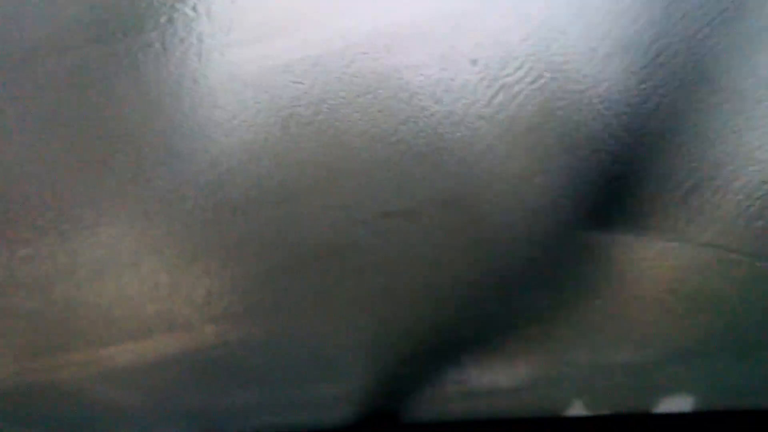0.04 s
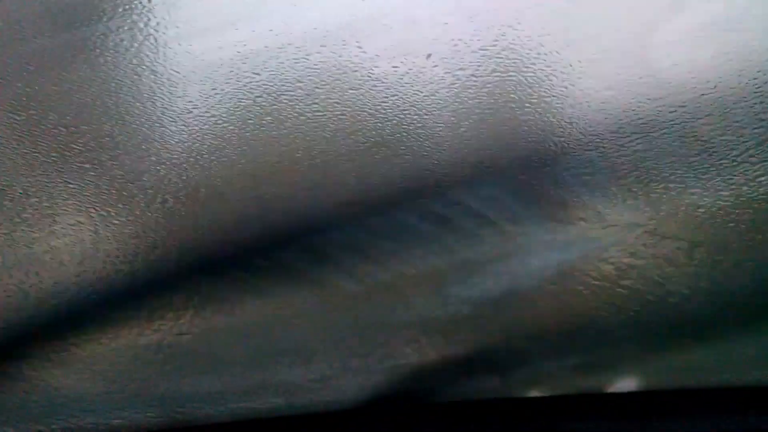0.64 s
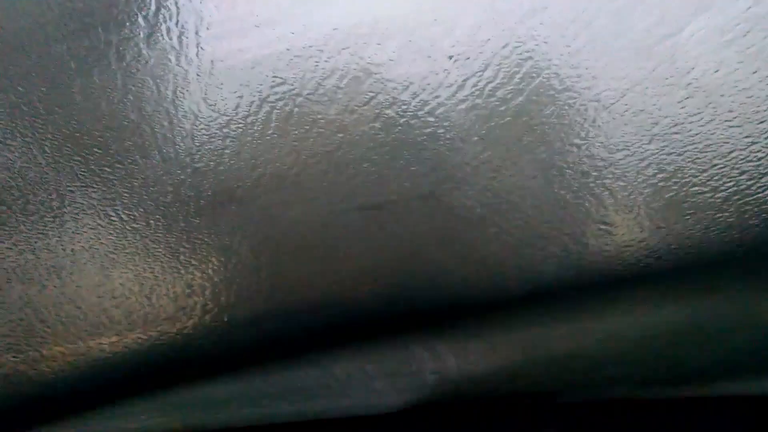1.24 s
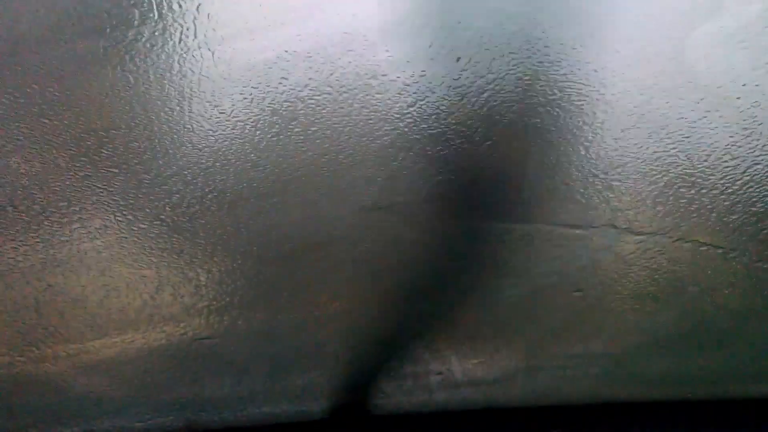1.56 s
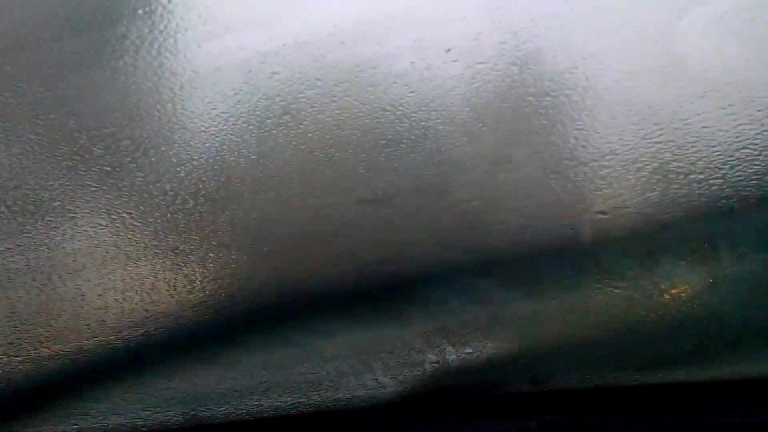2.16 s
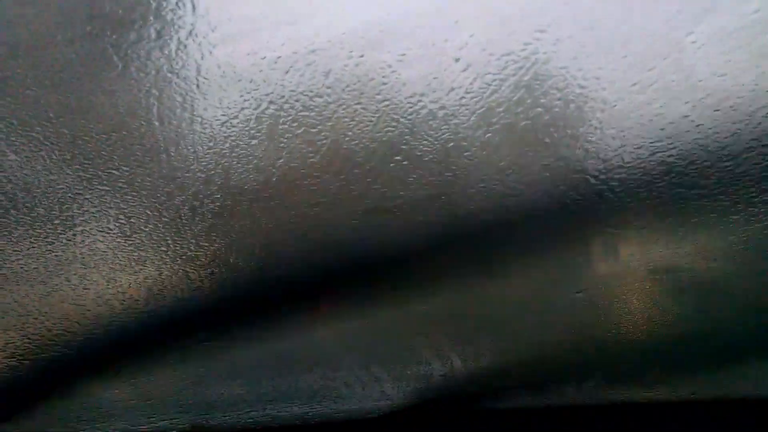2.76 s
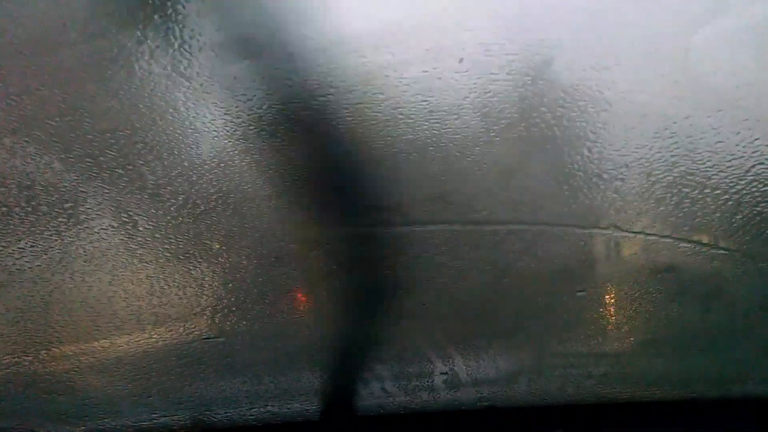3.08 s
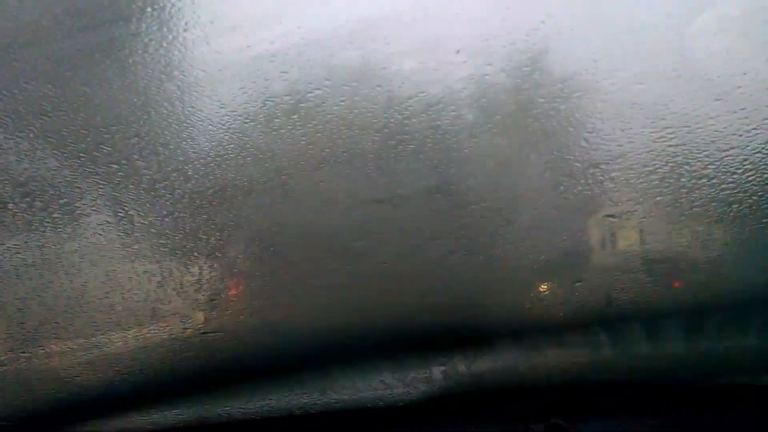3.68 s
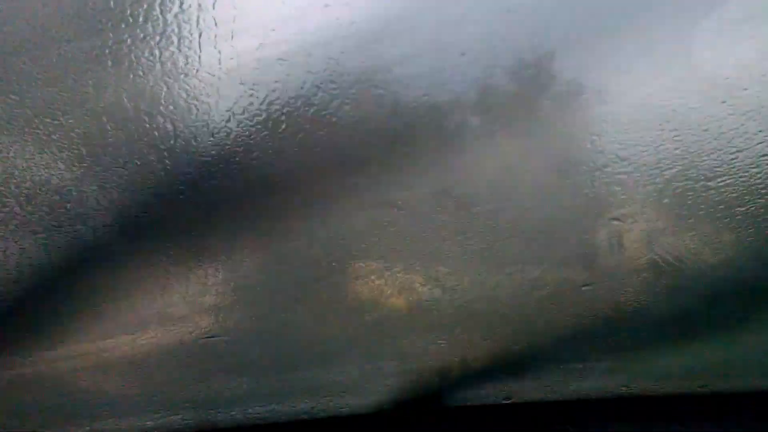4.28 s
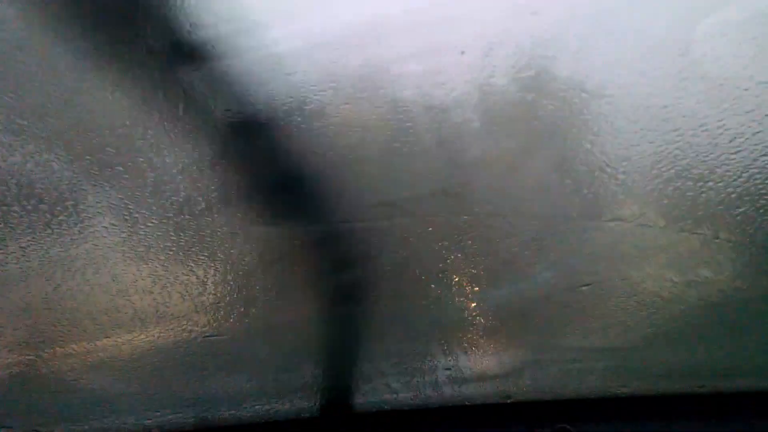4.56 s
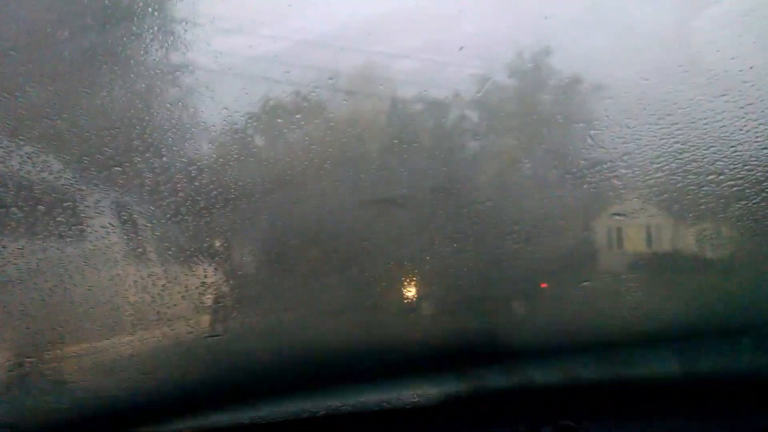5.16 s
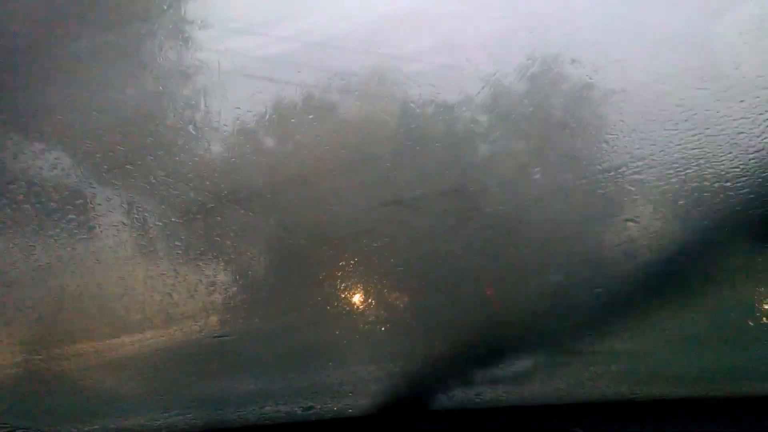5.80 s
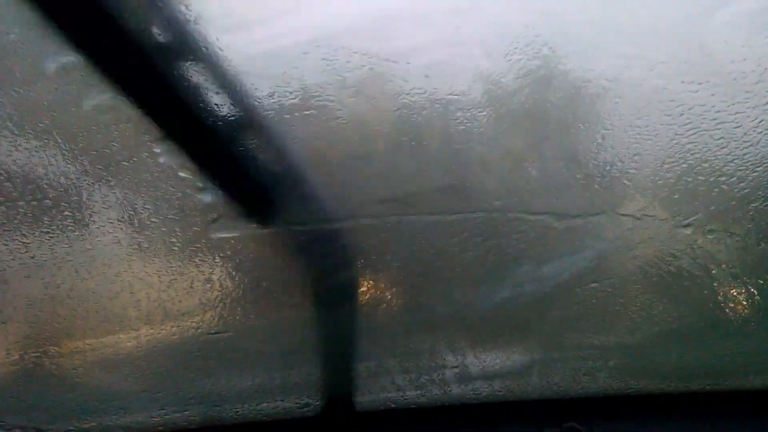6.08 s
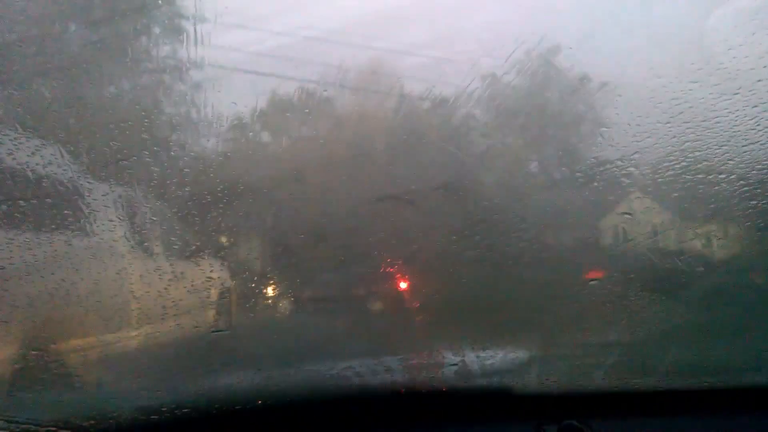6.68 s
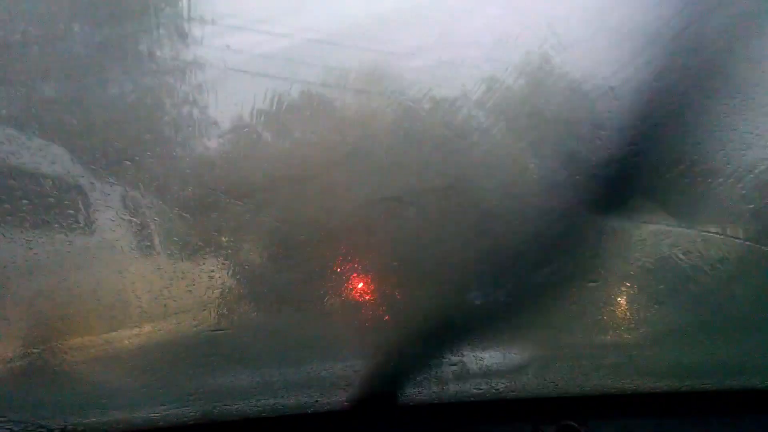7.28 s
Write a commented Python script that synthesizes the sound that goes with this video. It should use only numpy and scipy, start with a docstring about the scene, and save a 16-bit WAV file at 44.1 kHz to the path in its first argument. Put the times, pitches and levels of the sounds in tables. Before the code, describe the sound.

Windscreen wipers run at full speed for the whole seven and a half seconds, heard from inside a slowly moving car. A stroke comes about every 0.65 seconds, alternating up and down. Each is a rushing rubber scrub with a hiss of water: upstrokes drag lower and end in a small splash, while downstrokes catch, swell and stop short. The arms give dull thumps at the turns, often with a sharp little tick as the blades flip, clearest at about 0.6, 1.9 and 7 seconds. The watery hiss gradually thins, and the stroke at about 6.4 seconds is softer. Underneath, the wiper motor whines faintly, dropping in pitch on each upstroke. The engine throbs low, mostly on the right, and the tyres rumble steadily, with a soft hum swelling around 1, 4.3, 5.4 and 6.7 seconds. The sound is close and wide in stereo.

```python
"""Windscreen wipers on wet glass

Wipers run at full speed, heard from inside a slowly moving car. The rubber drags and scrubs, and the
water film hisses. At each turn the blades flip with a tick and the arms thump. Underneath, the wiper
motor whines, the engine throbs and the tyres rumble. The camera widens the stereo sound."""
import sys
import numpy as np
from scipy import signal
from scipy.fft import rfft, irfft, next_fast_len
from scipy.io import wavfile
from scipy.ndimage import uniform_filter1d, map_coordinates

SR = 44100
rng = np.random.default_rng(int(sys.argv[2]) if len(sys.argv) > 2 else 0)


def to_wav(sig):
    """Store sig (one row per channel, or 1-D mono) as 16-bit WAV at the path in sys.argv[1].

    Samples outside -1..1 are clipped; the rate is SR.
    """
    pcm = np.clip(np.atleast_2d(sig), -1, 1) * 32767
    pcm = np.round(pcm).astype(np.int16)
    wavfile.write(sys.argv[1], SR, pcm.T)  # frames by channels


N = 332514

# The tone of the rubber's scrub, the water's hiss and the rubber's low drag.
# Each row: frequency in Hz, relative level in dB.
SCRUB_TONE = [(200, -65), (420, 0.5), (600, -4.5), (790, -1), (880, -5), (1150, -1.5), (1400, -3.5),
              (1620, -1.5), (2000, -1.1), (2600, -4.5), (3100, -9), (3600, -14.5), (4600, -23.5),
              (9000, -41)]
HISS_TONE = [(600, -43), (1500, -0.5), (2600, 8.5), (3100, 7), (3700, 2), (4600, 3), (5400, 5.5),
             (6200, -1), (7200, 2.5), (8300, -1), (10300, 2.5), (12200, 1), (14000, -0.5), (15500, -21)]
DRAG_TONE = [(70, -40), (110, -22), (170, -8), (240, 0.5), (300, -1), (370, -1), (480, -7), (750, -9),
             (900, -12), (2000, -30.5), (5000, -63)]

def blades(grab_s=0.99, grab_width_s=0.024, grab_db=2.5, uneven_db=1.38):
    """Rubber sticks and slips on the glass and squeezes the water film ahead of it."""
    scrub_db, hiss_db, drag_db = stroke_levels()
    grab = np.exp(-((np.arange(N) / SR - grab_s) / grab_width_s) ** 2)  # the rubber grabs once
    scrub_db = scrub_db + grab_db * grab + uneven_db * wobble(28)  # contact is never quite even
    judder = wobble(85)  # the rubber lip chatters, shaking all its sounds together
    scrub = cabin(patchy_noise(depth_db=2.5) + 0.39 * slips(rate=1800, spread_db=3.5), SCRUB_TONE)
    rubbing_db = 0.16 * np.clip(scrub_db + 24.5, -8, 6)  # harder rubbing is brighter
    scrub = brighten(scrub, rubbing_db, low_hz=900, high_hz=1490)
    hiss = cabin(patchy_noise(depth_db=2.7) + 0.37 * slips(rate=3600, spread_db=6.5), HISS_TONE)
    # More water makes a finer, brighter spray; going down adds 1 dB more treble.
    water_db = np.array(STROKES)[:, 3]
    going_down = np.arange(len(STROKES)) % 2
    spray_db = by_stroke(1 + 0.81 * water_db + going_down)
    hiss = brighten(hiss, spray_db, low_hz=6160, high_hz=10500)
    drag = cabin(patchy_noise(depth_db=3.0) + 0.37 * slips(rate=170, spread_db=1.0), DRAG_TONE)
    return windscreen(scrub * amp(scrub_db + 2.5 + 0.88 * judder)
                      + hiss * amp(hiss_db + 5.0 + 0.5 * judder)
                      + drag * amp(drag_db + 0.25 * judder))


# The wiper strokes, up and down in turn. Each row: start in seconds, length in seconds,
# rubber pressure in dB, water on the glass in dB, build-up from start to end in dB.
STROKES = [ (-.024, 0.6, 0, 1.5, -2), (0.641, 0.59, -1.5, 0.5, 2), (1.267, 0.59, 0, -0.15, -1),
           (1.924, 0.59, 2.3, -0.8, 0.5), (2.53, 0.61, -1, -2, 2.5), (3.198, 0.59, 2, -2.5, 3),
           (3.819, 0.59, -1, -3, -3), (4.47, 0.61, 1.16, -3.5, 1.5), (5.105, 0.581, -1, -4, 0),
           (5.755, 0.59, 2, -2.8, 3), (6.377, 0.61, -4.5, -7, 4.5), (7.037, 0.57, 1.5, -5, 1), ]
# Going up, the blade drags hard and ends in a splash. Going down, it catches twice, swells and stops
# short. Each row: fraction of the stroke gone by, scrub in dB, hiss in dB, drag in dB.
UPSTROKE = [(0, -54, -49.5, -38), (.09, -34, -35.5, -30.5), (.2, -34, -34, -25), (.29, -29.5, -32.5, -25.5),
            (.4, -26.5, -31, -23), (.53, -27.5, -32, -28.5), (.68, -28.5, -33, -23), (.76, -28, -28, -21.5),
            (.83, -31.5, -27, -21.5), (.9, -36.5, -33.5, -32.5), (.96, -45, -47.5, -37),
            (1, -48, -49.5, -35)]
DOWNSTROKE = [(0, -48.5, -50, -34), (0.046, -30.5, -31.5, -30), (.13, -35, -33, -45),
              (.21, -25, -28, -27.5), (.31, -27, -33.5, -30), (.44, -26, -31.5, -32.5),
              (.62, -23, -27, -34.5), (.78, -23.5, -29.5, -34.5), (.9, -24, -31, -30),
              (.955, -32, -37, -24.5), (1.002, -51, -59, -39)]

def stroke_levels(drag_per_pressure=0.56):
    """Scrub, hiss and drag in dB over time: pressure raises scrub and drag, water raises hiss."""
    rows = []
    for k, (start, length, pressure_db, water_db, build_db) in enumerate(STROKES):
        for fraction, scrub_db, hiss_db, drag_db in (DOWNSTROKE if k % 2 else UPSTROKE):
            swell_db = build_db * (fraction - 0.5)
            rows.append((start + fraction * length,
                         scrub_db + pressure_db + swell_db,
                         hiss_db + water_db + swell_db,
                         drag_db + drag_per_pressure * pressure_db))
    return curves(rows)


# Where the glass and cabin ring. Each row: frequency in Hz, width in Hz, boost in dB.
GLASS_RESONANCES = [(248, 18, -1), (293.3, 8.2, 4.5), (329, 7.7, 5.5), (586, 32, 6.5), (688, 59, 3.5),
                    (772, 16, 5), (1035, 34, 1), (1470, 84, 3), (1607, 29, 4.5), (1810, 190, 1),
                    (2756, 40, 5.5), (3050, 67, 3.5), (3390, 110, 4.5), (3645, 130, 5), (3990, 55, 5),
                    (6100, 100, 3.5)]

def windscreen(x):
    """The glass and cabin colour a sound by ringing in narrow bands."""
    def response(hz):
        return 1 + sum((amp(db) - 1) * 1j * hz * width / (centre ** 2 - hz ** 2 + 1j * hz * width)
                       for centre, width, db in GLASS_RESONANCES)
    return filtered(x, response)


# The arms take up their slack at the turns.
# Each row: start in seconds, peak level in dB, centre frequency of the blow in Hz.
ARM_KNOCKS = [(0.001, -9.5, 192), (.553, -15.5, 240), (0.569, -16, 190), (.637, -12, 166),
              (1.287, -10, 206), (1.303, -15, 125), (1.833, -18, 150), (1.854, -15, 160), (1.929, -12, 206),
              (2.562, -9.5, 148), (3.14, -14.5, 109), (3.21, -9, 115), (3.225, -14, 240), (4.486, -12, 240),
              (5.074, -17, 250), (5.105, -15, 130), (5.121, -11, 180), (5.681, -14, 120),
              (5.755, -12.5, 285), (6.299, -10, 121), (6.307, -13.5, 136), (6.328, -12, 260),
              (6.969, -11, 192), (7.042, -9, 248)]
# The notes of the panel under the arms.
# Each row: frequency in Hz, relative level in dB, seconds to fade by 60 dB.
PANEL_NOTES = [(113.5, 0, 0.18), (135.7, 0.5, 0.052), (181, -1.5, 0.068), (225.3, 3, 0.083),
               (288, 0, 0.047), (353, -1.5, 0.12), (580, -2, 0.043)]

def arm_thumps(attack_s=0.0015, spread_octaves=0.77):
    """At each turn the linkage knocks the panel; a blow rings the notes nearest its centre frequency."""
    track, t = np.zeros(N), np.arange(SR // 3) / SR
    hz, level_db, fade_s = np.transpose(PANEL_NOTES)[:, :, None]
    for start, peak_db, centre_hz in ARM_KNOCKS:
        detune, phase = rng.standard_normal((2, len(PANEL_NOTES), 1))
        strength = np.exp(-0.5 * (np.log2(hz / centre_hz) / spread_octaves) ** 2)
        notes = np.sin(2 * np.pi * hz * (1 + 0.018 * detune) * t + 0.72 * phase)
        ring = np.sum(strength * amp(level_db - 60 * t / fade_s) * notes, axis=0)
        ring *= 1 - np.exp(-t / attack_s)
        add(track, start, amp(peak_db) * ring / np.abs(ring).max())
    return track


# The rubber lips flip over. Each row: start in seconds, level in dB.
LIP_FLIPS = [(0.62, -20.5), (.633, -23), (1.247, -33), (1.94, -24), (2.547, -30), (3.228, -31),
             (4.502, -30), (5.681, -32), (5.745, -29), (6.377, -45), (6.969, -32), (7.0295, -26.5)]
# The tone of the tick. Each row: frequency in Hz, relative level in dB.
TICK_TONE = [(400, -22), (1500, 14), (2800, 21), (3900, 10.5), (4700, 13), (6000, 11), (8500, -2),
             (12000, 6), (15500, -6)]

def lip_ticks(attack_s=0.00055, snap_fade_s=0.027, smack_fade_s=0.18, smack_db=-11):
    """The wet lip snaps to its other side: a sharp tick with a short smack behind it."""
    envelope, t = np.zeros(N), np.arange(SR // 8) / SR
    snap = amp(-60 * t / snap_fade_s)
    smack = amp(smack_db - 60 * t / smack_fade_s)
    tick = (snap + smack) * (1 - np.exp(-t / attack_s))
    for start, db in LIP_FLIPS:
        add(envelope, start, amp(db) * tick)
    return envelope * cabin(rng.standard_normal((2, N)), TICK_TONE)


def wiper_motor(up_hz=361.4, down_hz=438, level_db=-40):
    """The motor whines faintly and slows as it pushes the blades up."""
    pitch_hz = by_stroke(np.resize([up_hz, down_hz], len(STROKES))) + 5 * wobble(14)
    whine = np.sin(2 * np.pi * np.cumsum(pitch_hz) / SR)
    return amp(level_db + 0.93 * wobble(6.5)) * whine


# The engine's low tones. Each row: frequency in Hz, left level in dB, right level in dB.
ENGINE_TONES = [(29.8, -41.5, -26), (60.6, -56, -37.5), (116.9, -43.5, -37.5)]

def engine():
    """The engine runs a little unevenly and throbs in the cabin, mostly on the right."""
    speed_drift = 0.0088 * wobble(3.2) + 0.015 * wobble(22)
    clock = np.arange(N) / SR + np.cumsum(speed_drift) / SR
    throb = amp(1.2 * wobble(2.95))
    return throb * sum(amp([[left_db], [right_db]]) * unit(np.sin(2 * np.pi * hz * clock))
                       for hz, left_db, right_db in ENGINE_TONES)


# The tone of the tyre rumble. Each row: frequency in Hz, relative level in dB.
ROAD_TONE = [(15, -22), (32, -15), (40, -11), (52, -8), (78, -4), (105, -0.5), (128, 0), (160, -1),
             (260, -1), (450, -6.5), (750, -19), (1200, -26), (3000, -41), (8000, -45), (15000, -38)]
# Swells of hum. Each row: middle in seconds, length in seconds, frequency in Hz, level in dB.
HUMS = [(0.958, 2.1, 118.3, -34.5), (4.27, 0.64, 156.8, -33), (5.445, 0.61, 131.9, -30),
        (6.725, .6, 156.1, -29)]

def road():
    """Tyres rumble on the wet road, with a hum that comes and goes."""
    rumble = amp(-28.5 + 0.066 * wobble(3.2)) * cabin(patchy_noise(depth_db=1.0), ROAD_TONE)
    hum, t = np.zeros(N), np.arange(N) / SR
    waver = 0.65 * wobble(25)
    for middle, length, hz, db in HUMS:
        swell = np.cos(np.pi * np.clip((t - middle) / length, -0.5, 0.5))
        hum += amp(db) * swell * np.sin(2 * np.pi * hz * t + waver)
    return rumble + amp(2.4 * wobble(6.3)) * hum


# How alike left and right are. Each row: frequency in Hz, likeness from 0 (unrelated) to 1 (the same).
LIKENESS = [(60, 0), (160, 0), (280, 0.54), (650, 0.56), (1200, 0.21), (2000, 0), (4000, 0.099)]

def cabin(pair, tone):
    """Give two unrelated noises a tone and blend them into a partly alike left and right."""
    def response(hz):
        angle = np.arccos(np.clip(along(LIKENESS, hz), -1, 1)) / 2
        return amp(along(tone, hz)) * [np.cos(angle), np.sin(angle)]
    mid, side = filtered(pair, response)
    return unit(np.array([mid + side, mid - side]))


# How the two sides differ in level. Each row: frequency in Hz, left minus right in dB.
BALANCE = [(30, -34), (70, -4.5), (130, -8), (260, -2.5), (600, -0.5), (1300, -3.5), (3000, -0.5),
           (9000, -4.5), (15000, -1.5)]
# How far the left side lags. Each row: frequency in Hz, phase lag in radians.
BASS_LAG = [(30, 4.5), (120, 1.5), (300, 1.36), (600, 0), (1300, 0)]

def microphone(x):
    """The left microphone opening hears the cabin more weakly, and its bass later."""
    sides = np.array([[0.5], [-0.5]])
    return filtered(x, lambda hz: amp(sides * along(BALANCE, hz))
                    * np.exp(-1j * sides * along(BASS_LAG, hz)))


def amp(db):
    """Turn decibels into a gain."""
    return 10 ** (np.asarray(db) / 20)


def unit(x):
    """Scale x to an average (rms) level of 1."""
    return x / np.sqrt(np.mean(x ** 2) + 1e-20)


def along(points, hz):
    """Read between rows of (Hz, value) on a logarithmic frequency scale."""
    row_hz, values = np.transpose(points)
    return np.interp(np.log(hz + 1), np.log(row_hz + 1), values)


def curves(rows):
    """Turn rows of (seconds, values...) into one curve over time for each value."""
    seconds, *columns = np.transpose(rows)
    return [np.interp(np.arange(N) / SR, seconds, column) for column in columns]


def by_stroke(values):
    """A curve that passes through one value in the middle of each stroke."""
    start, length = np.transpose(STROKES)[:2]
    return curves(np.column_stack([start + length / 2, values]))[0]


def wobble(rate):
    """A smooth curve through `rate` random values a second."""
    steps = np.linspace(0, N, num=8000)
    knots = rng.standard_normal(int(N * rate / SR) + 4)
    return np.interp(np.arange(N), steps, map_coordinates(knots, [steps * rate / SR]))


def patchy_noise(depth_db):
    """Two noises whose tone drifts in patches of time and frequency."""
    spectra = signal.stft(rng.standard_normal((2, N)), nperseg=1024)[2]
    patches = uniform_filter1d(rng.standard_normal(spectra.shape[1:]), size=5, axis=0)
    patches = unit(uniform_filter1d(patches, size=7, axis=1))
    return unit(signal.istft(spectra * amp(depth_db * patches), nperseg=1024)[1][:, :N])


def slips(rate, spread_db):
    """Tiny clicks of uneven size in two channels, about `rate` a second."""
    happens = rng.random(N) < rate / SR
    size = amp(spread_db * np.clip(rng.standard_normal(N), -2, 2))
    return unit(happens * size * rng.standard_normal((2, N)))


def filtered(x, response):
    """Change each frequency's level and phase by response(hz)."""
    size = next_fast_len(N + 8192)
    return irfft(rfft(x, size) * response(np.fft.rfftfreq(size, 1 / SR)), size)[..., :N]


def brighten(x, lift_db, low_hz, high_hz):
    """Turn the treble up or down, following the curve lift_db."""
    treble = filtered(x, lambda hz: along([(low_hz, 0), (high_hz, 1)], hz))
    return x + treble * (amp(lift_db) - 1)


def add(track, start_s, sound):
    """Mix a sound into a track at the given time."""
    part = track[..., max(round(start_s * SR), 0):][..., :sound.shape[-1]]
    part += sound[..., :part.shape[-1]]


def scene():
    """Wipers and car together."""
    return microphone(blades() + arm_thumps() + lip_ticks() + wiper_motor() + road()) + engine()


# The camera's stereo widening. Each row: frequency in Hz, share of each side taken from the other.
WIDENING = [(300, 0.037), (700, 0.13), (1200, 0.53), (2500, 0.59), (15000, 0.57)]

def record(dry, delay_s=17.05 / SR, ceiling=0.8, top_hz=15550):
    """The camera subtracts a delayed share of the other side, rounds peaks and cuts the top treble."""
    share = lambda hz: along(WIDENING, hz)
    opposite = filtered(dry[::-1], lambda hz: share(hz) * np.exp(-2j * np.pi * hz * delay_s))
    wide = filtered(dry - opposite, lambda hz: 1 / np.sqrt(1 + share(hz) ** 2))
    rounded = wide / (1 + (wide / ceiling) ** 6) ** (1 / 6)
    return filtered(rounded, lambda hz: hz < top_hz)


dry = scene()
out = record(dry)
to_wav(out)
```